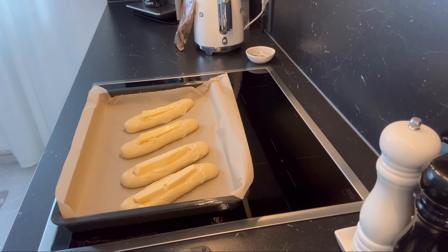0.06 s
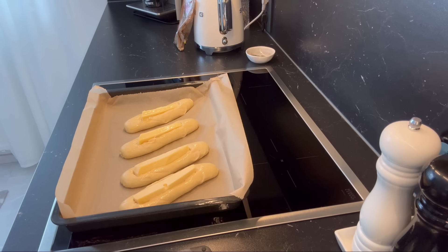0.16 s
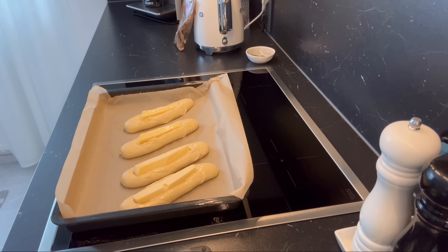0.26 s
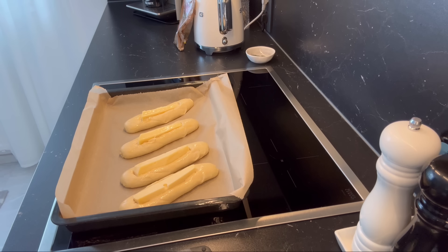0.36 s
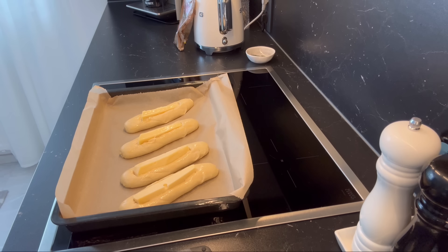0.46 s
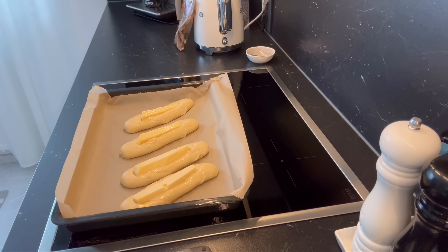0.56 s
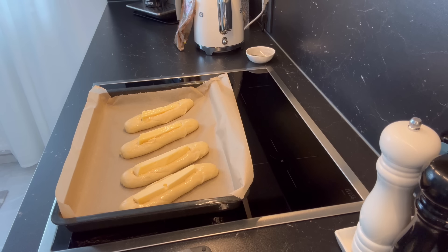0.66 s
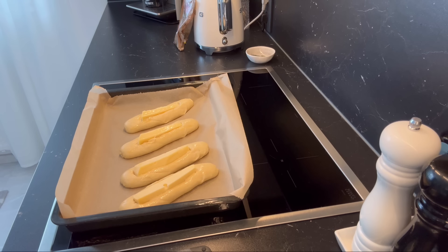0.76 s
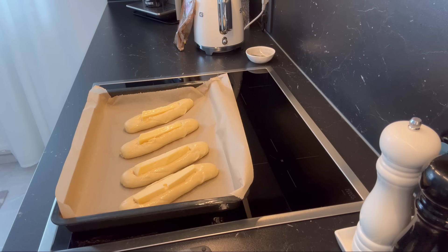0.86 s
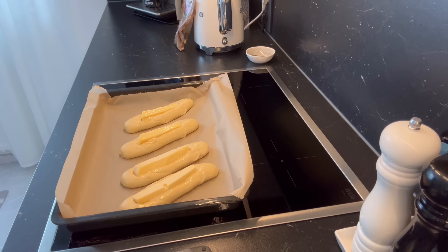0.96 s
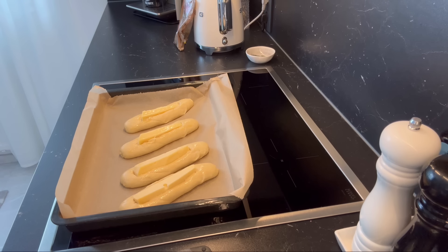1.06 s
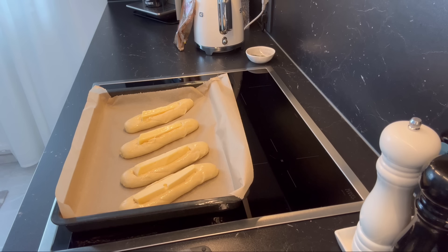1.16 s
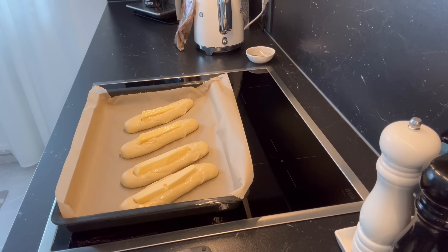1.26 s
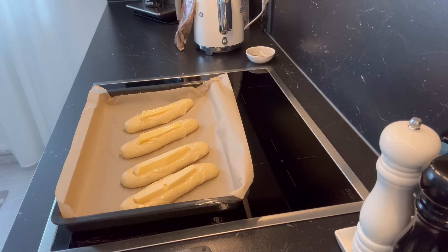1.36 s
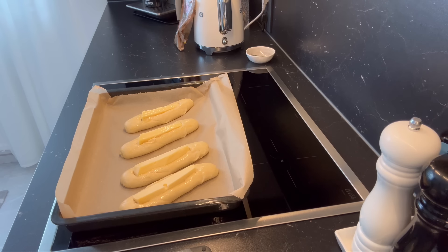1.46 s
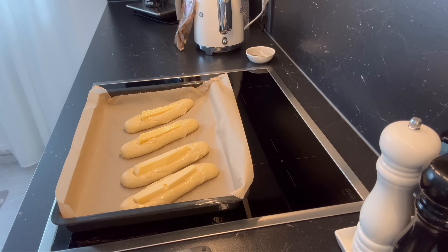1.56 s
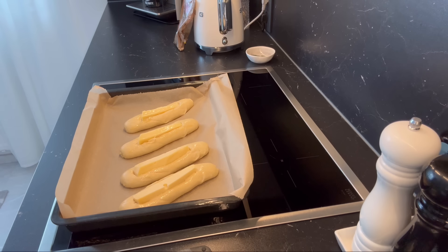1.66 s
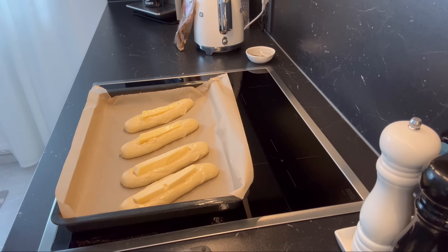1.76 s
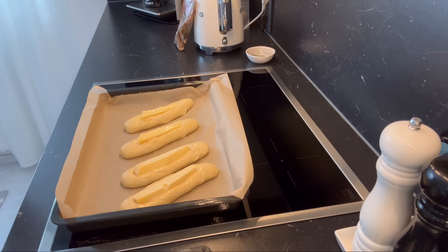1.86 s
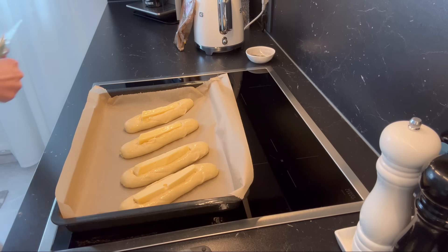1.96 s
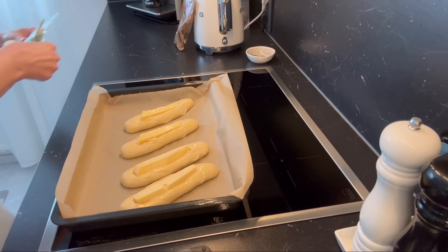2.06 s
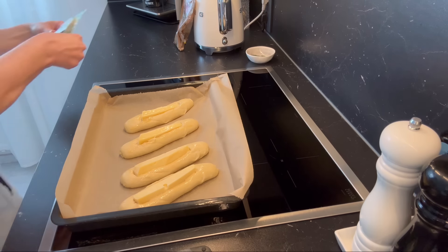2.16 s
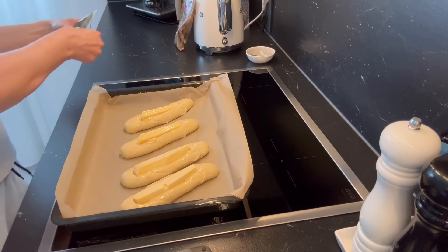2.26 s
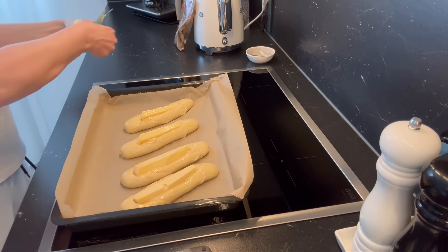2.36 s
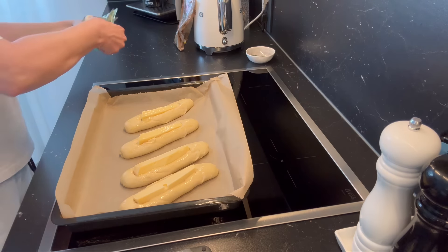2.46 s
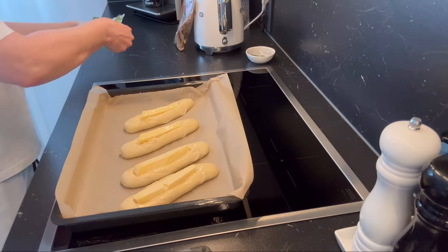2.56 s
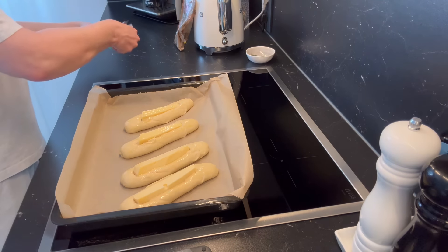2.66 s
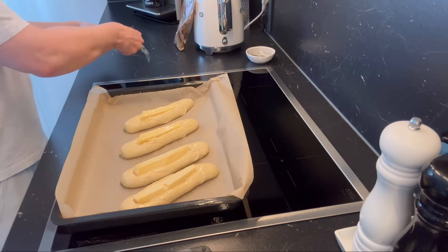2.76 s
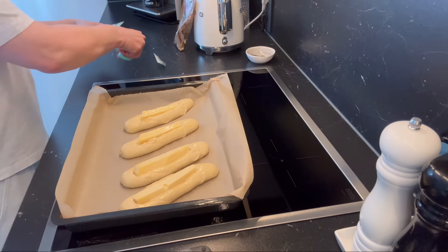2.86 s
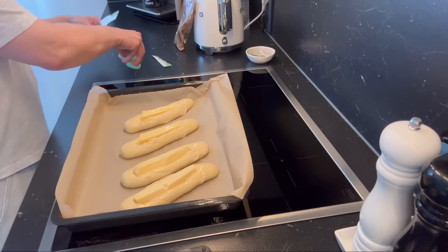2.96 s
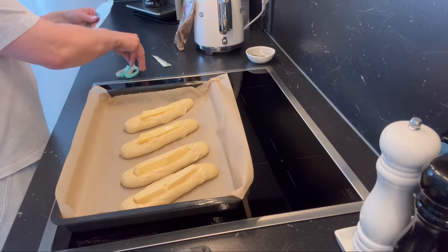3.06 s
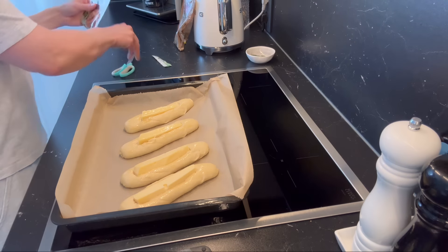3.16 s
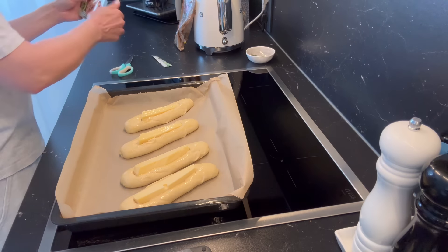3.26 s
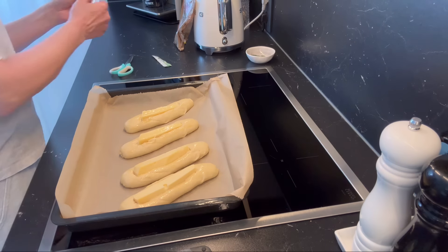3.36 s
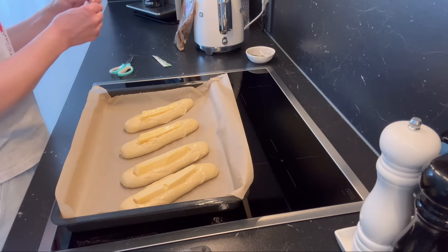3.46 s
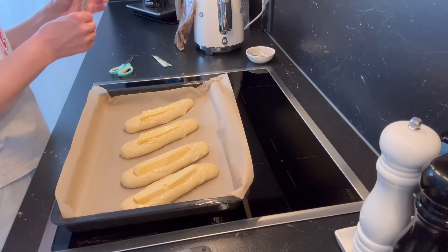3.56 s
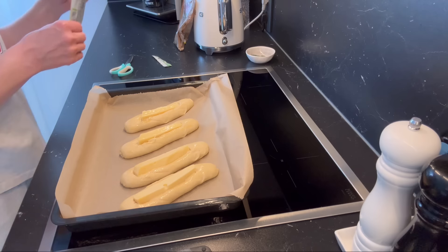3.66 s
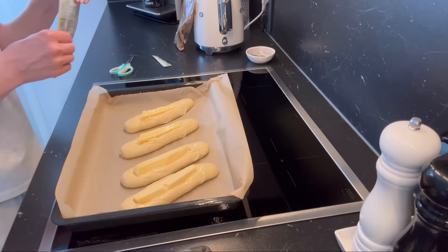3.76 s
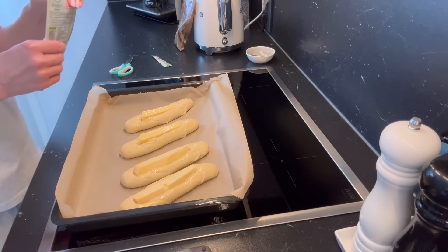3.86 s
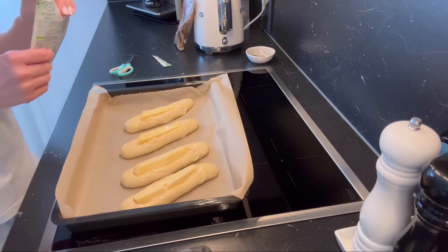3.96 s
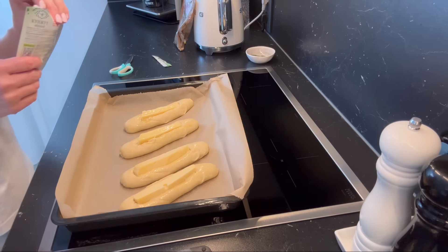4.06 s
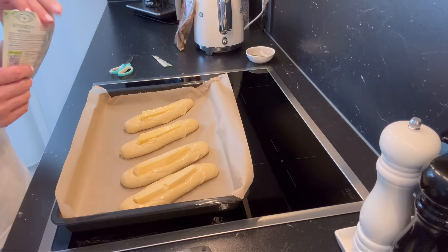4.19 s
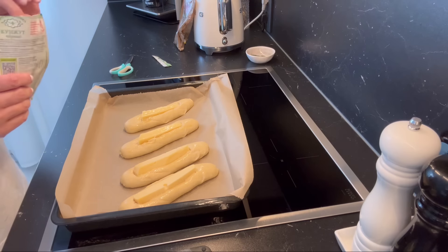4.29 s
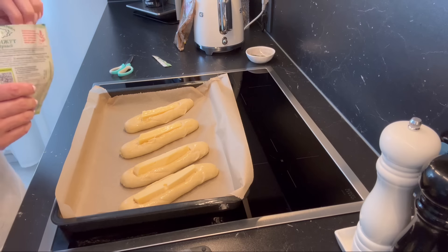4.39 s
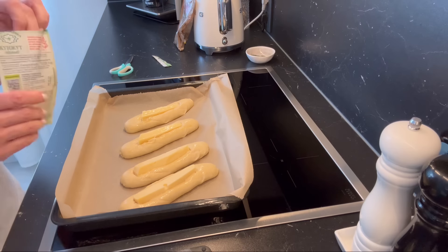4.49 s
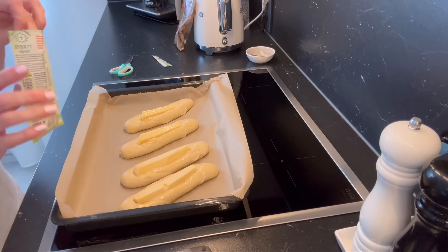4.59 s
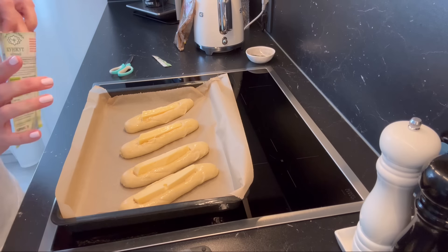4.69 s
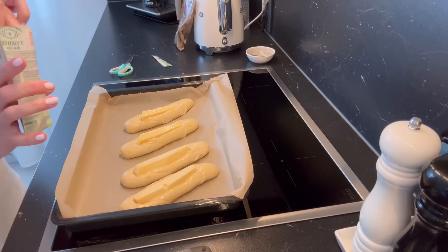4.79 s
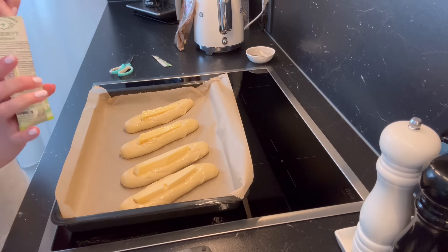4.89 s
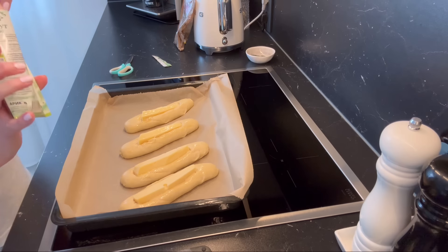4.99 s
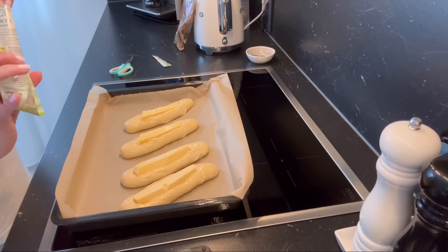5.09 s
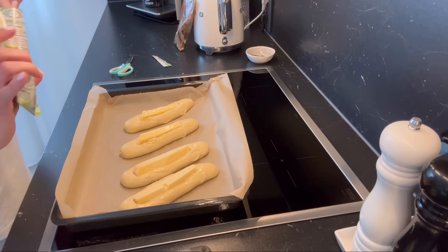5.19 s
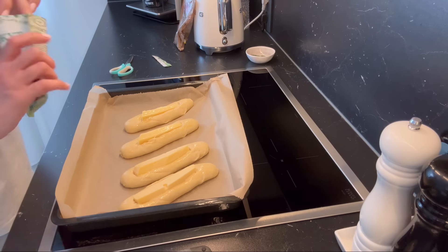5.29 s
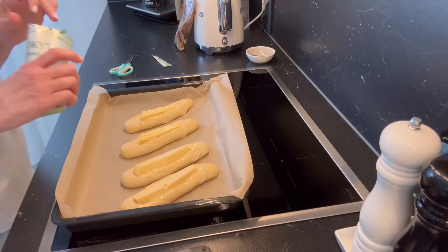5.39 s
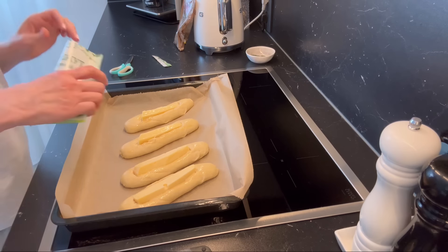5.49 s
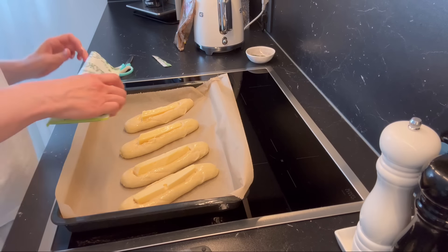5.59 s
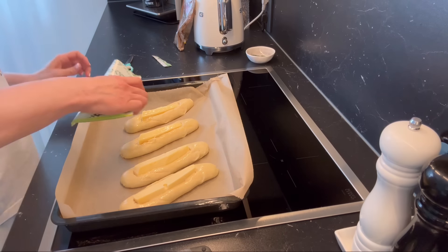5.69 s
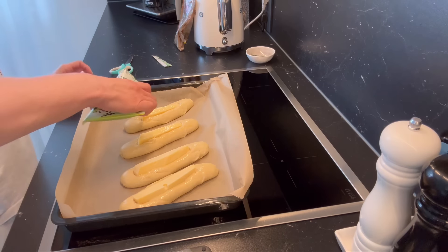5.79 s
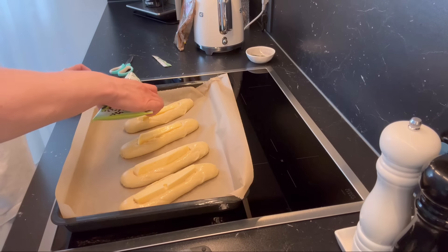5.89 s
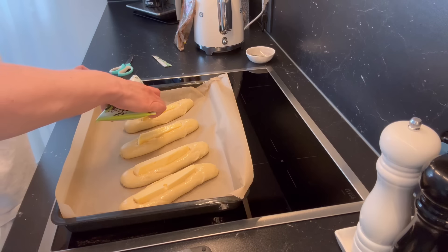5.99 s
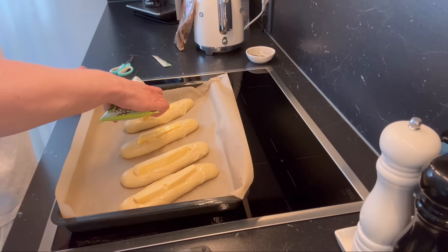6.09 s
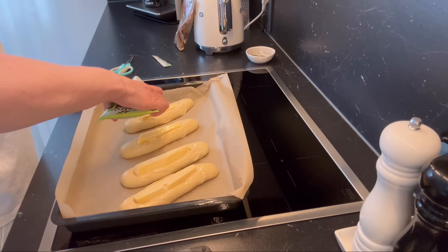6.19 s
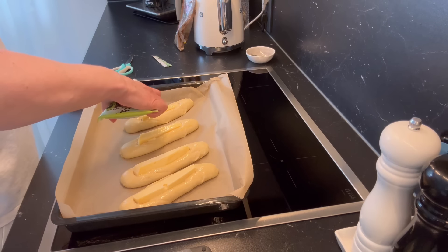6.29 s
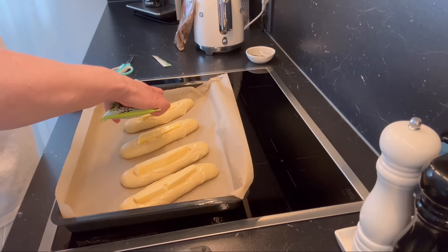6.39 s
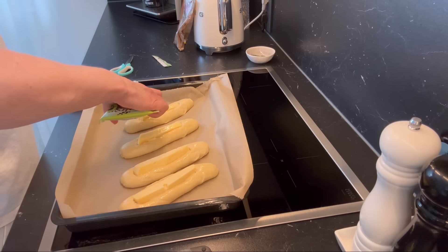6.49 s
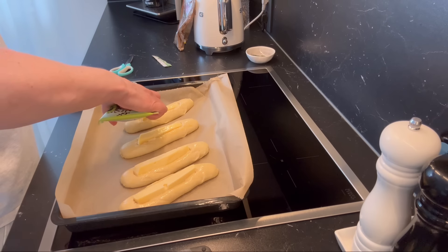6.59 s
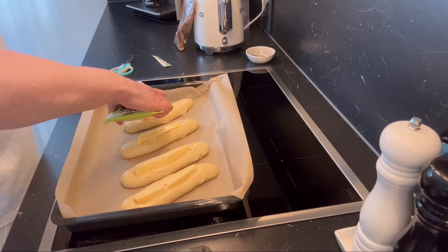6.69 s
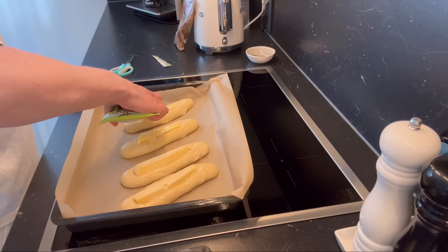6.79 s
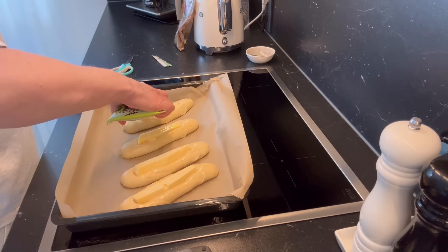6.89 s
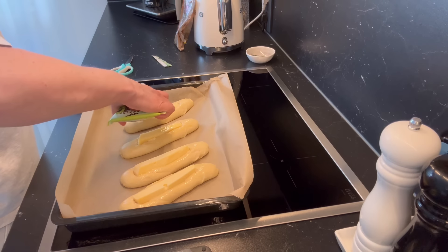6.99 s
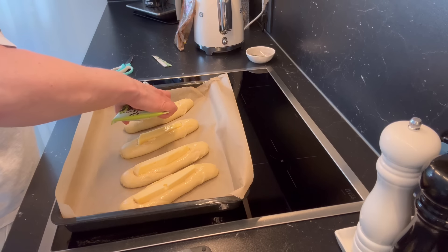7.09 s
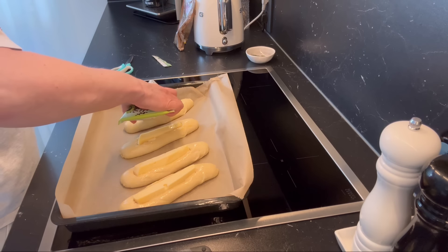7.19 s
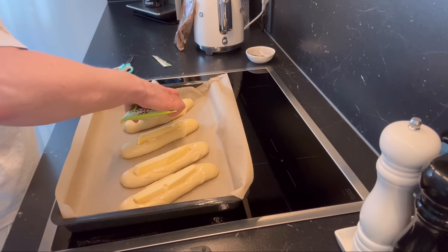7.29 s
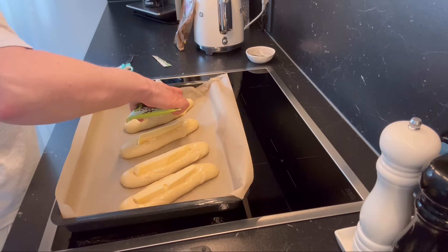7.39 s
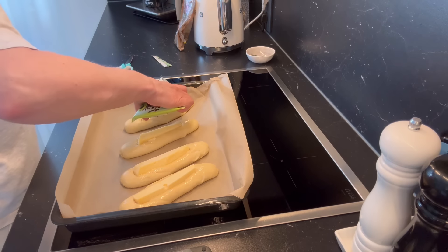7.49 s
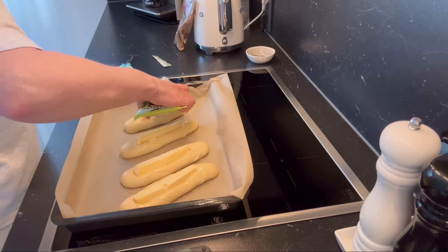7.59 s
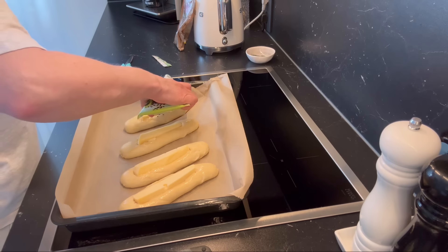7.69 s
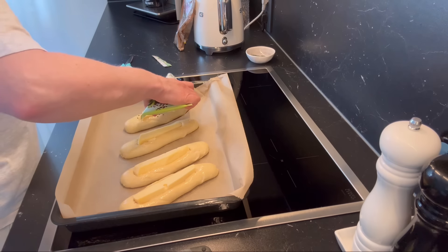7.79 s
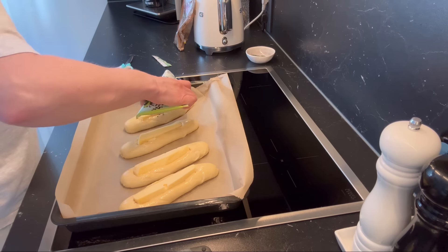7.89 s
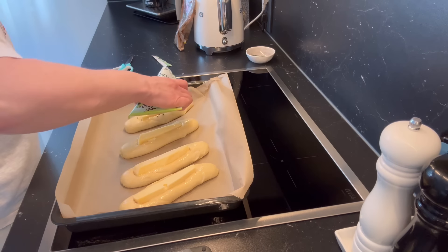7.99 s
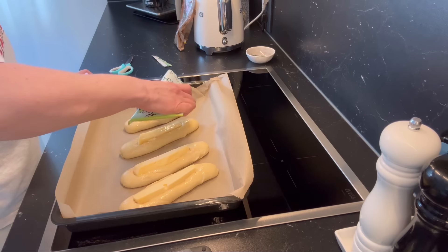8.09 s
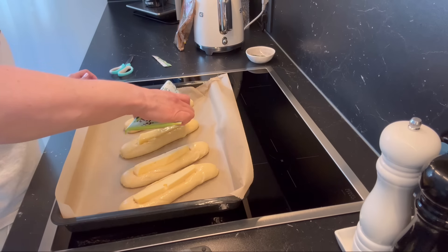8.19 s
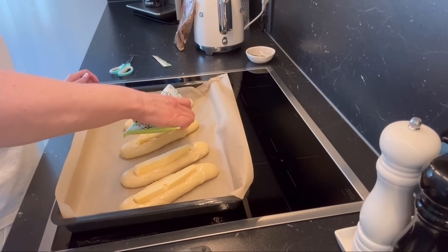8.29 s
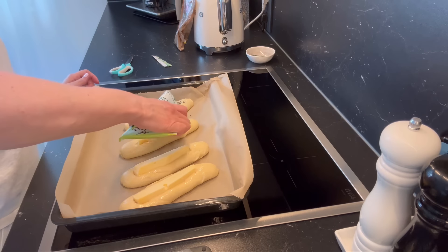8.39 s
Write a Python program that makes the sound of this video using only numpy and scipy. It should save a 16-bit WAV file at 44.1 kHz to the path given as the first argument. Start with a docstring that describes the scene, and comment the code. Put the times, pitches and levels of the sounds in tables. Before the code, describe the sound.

A drawer bumps shut with a brief steel jingle, followed by low footfalls and faint plastic crinkles. Sharp snips cut a small packet; scissors drop and bounce on a stone worktop. The film then snaps loudly, and seeds slide and patter as the packet is shaken, fading to sparse ticks. Close small stereo microphone in a reflective kitchen, faint fridge hum.

```python
"""Seed packet in a kitchen

In a hard kitchen a drawer shuts with a jingle of cutlery, and someone steps about: decaying sines, low noise.
A small plastic packet is handled and cut open: clumps of clicks ring its film and body.
Scissors drop on the worktop and bounce: noise ticks, ringing modes and a rattle.
Seeds then slide and hiss in the shaken packet: dense grains under swells. A fridge hums in the room tone:
narrow noise bands and a whine over air noise. Random taps give the room's reflections."""
import sys
import numpy as np
from scipy import signal
from scipy.fft import rfft, irfft, next_fast_len
from scipy.io import wavfile
from scipy.ndimage import uniform_filter1d

SR = 44100
rng = np.random.default_rng(int(sys.argv[2]) if len(sys.argv) > 2 else 0)


def dump_mix(stems):
    """Bounce the given channels to the path in sys.argv[1] as a 16-bit WAV at rate SR."""
    frames = np.atleast_2d(stems).T  # one column per channel
    limited = np.clip(frames, -1, 1)  # hard clip at full scale
    pcm = np.round(limited * 32767).astype(np.int16)
    wavfile.write(sys.argv[1], SR, pcm)


N = 372644


def gain_of(db):
    """dB to gain."""
    return 10 ** (np.asarray(db) / 20)


def evened(x):
    """Scales to rms 1."""
    return x / np.sqrt(np.mean(x ** 2) + 1e-20)


def read(points, hz):
    """Reads a spectrum on a log-frequency axis."""
    f, value = np.transpose(points)
    return np.interp(np.log(hz + 1), np.log(f + 1), value)


def curves(table):
    """Each column after the first (seconds) as a curve at sample rate."""
    s, *columns = np.transpose(table)
    return [np.interp(np.arange(N) / SR, s, c) for c in columns]


def add(mix, s, sound):
    """Mixes a sound in at time s, in place."""
    part = mix[round(s * SR):][:len(sound)]
    part += sound[:len(part)]


def shaped(x, response):
    """Filters by a function of frequency."""
    size = next_fast_len(N)
    return irfft(rfft(x, size) * response(np.fft.rfftfreq(size, 1 / SR)), size)[..., :N]


def coloured(x, tone):
    """Noise or clicks filtered to a spectrum in relative dB, at rms 1."""
    return evened(shaped(x, lambda hz: gain_of(read(tone, hz))))


def above(hz, corner_hz):
    """Gentle high-pass response, -6 dB at the corner."""
    return hz ** 2 / (hz ** 2 + corner_hz ** 2)


def resonate(x, hz, width_hz):
    """A fixed resonance of gain 1 at its centre."""
    return signal.lfilter(*signal.iirpeak(hz, hz / width_hz, SR), x)


def swell(t, db, rise_s, t60_s):
    """Envelope that rises as t squared, then dies exponentially."""
    return np.minimum(t / rise_s, 1) ** 2 * gain_of(db - 60 * np.maximum(t - rise_s, 0) / t60_s)


def grains(per_s, spread_db, tone):
    """Random tiny clicks of unlike sizes, coloured by what they shake."""
    sizes = gain_of(spread_db * np.minimum(rng.exponential(1, N), 5))
    clicks = rng.standard_normal(N) * sizes * (rng.random(N) < per_s / SR)
    return coloured(clicks, tone)


def room_tone():
    """Steady air noise, partly shared by the ports, and the fuzzy lines of the fridge with a thin whine."""
    # Each row: frequency in Hz, density in relative dB.
    air_tone = [(30, -14), (87, -8), (250, -14.5), (344, -13), (545, -16.5), (750, -22), (1040, -21.5),
                (1300, -41.5), (3000, -39), (9000, -41), (13500, -54), (14500, -83.5)]
    # Left-right correlation of the air noise. Each row: frequency in Hz, likeness from -1 to 1.
    likeness = [(60, 0.42), (240, -0.074), (950, -0.51), (3770, 0.11), (15000, 0.94)]
    # Fridge lines. Each row: frequency in Hz, width in Hz, level in dB.
    hum_lines = [(75.2, 12.4, -63.5), (199.8, 4.6, -72), (312.7, 11, -71.5), (364.8, 13, -74.5)]
    air_db, whine_hz, whine_db = -61, 3208, -82

    def same(hz):
        return np.clip(read(likeness, hz), -1, 1)

    left, other = rng.standard_normal((2, N))
    right = shaped(left, same) + shaped(other, lambda hz: np.sqrt(1 - same(hz) ** 2))
    air = coloured(np.array([left, right]), air_tone)
    hum = np.zeros(N)
    for hz, width_hz, db in hum_lines:
        once = resonate(rng.standard_normal(N), hz, width_hz)
        hum += gain_of(db) * evened(resonate(once, hz, width_hz))
    whine = gain_of(whine_db) * np.sin(2 * np.pi * whine_hz * np.arange(N) / SR)
    return (gain_of(air_db) * air + hum + whine) * gain_of([[-1.6], [1.7]])  # left, right dB


def rumble():
    """Lumpy low noise from wood and panels: a slow bed, and knocks that swell and die, some brighter."""
    # Someone moving about. Each row: time in seconds, level in dB, brightness in dB.
    bed = [(0.25, -44.5, -22), (0.93, -49.5, -31), (1.14, -66, 15.5), (1.57, -64.5, -5), (2.0, -62, 5.5),
           (2.9, -75.5, 12.5), (3.8, -74.5, 4), (4.5, -57.5, 6.5), (5.3, -58.5, -3.5), (5.8, -93, 5)]
    # Drawer, cupboard and hands. Each row: peak in seconds, level in dB, brightness in dB,
    # rise in seconds, t60 in seconds.
    knocks = [(0.073, -36, 4, 0.047, 0.21), (0.131, -25, -0.5, 0.052, 0.19),
              (1.028, -36.5, -10.5, 0.15, 0.14), (2.28, -58.5, 13.5, 0.14, 0.55),
              (2.42, -60.5, 18.5, 0.14, 0.14), (2.659, -62, 20, 0.021, 0.17), (3.4, -47.5, -12, 0.19, 0.6),
              (3.76, -53.5, 4, 0.087, 0.055), (4.619, -39.5, -26, 0.18, 0.048),
              (4.906, -36, -12, 0.018, 0.12), (5.588, -52, 10.5, 0.0078, 0.23)]
    # Each row: frequency in Hz, density in relative dB.
    rumble_tone = [(40, -23.5), (75, 3), (130, -6.5), (200, -1), (256, -9), (404, -6.5), (593, -8),
                   (680, -14.5), (815, -12), (2020, -27.5), (9000, -44), (15000, -46)]
    t = np.arange(SR) / SR
    level_db, bright_db = curves(bed)
    low_power = gain_of(2 * level_db)
    high_power = gain_of(2 * (level_db + bright_db))
    for s, db, knock_bright_db, rise_s, t60_s in knocks:
        envelope = swell(t, db, rise_s, t60_s)
        start_s = max(s - rise_s, 0)
        add(low_power, start_s, envelope ** 2)
        add(high_power, start_s, (envelope * gain_of(knock_bright_db)) ** 2)
    noise = coloured(rng.standard_normal(N), rumble_tone)
    high = shaped(noise, lambda hz: above(hz, 310.0))
    return np.sqrt(low_power) * (noise - high) + np.sqrt(high_power) * high


def rustle():
    """Small creases crackle in clumps; fuller handling brings out the body of the bag."""
    # Hands working the packet. Each row: time in seconds, level in dB, body against film in dB.
    handling = [(0.1, -57.5, -2), (0.3, -81, -15.5), (0.75, -71.5, 12.5), (0.95, -79, -3), (1.11, -66, 6),
                (1.25, -76, 22), (1.35, -73.5, -9), (1.57, -71, -31), (1.75, -65.5, 7), (2.33, -59, -18),
                (2.56, -63, 0), (2.67, -57, -3), (2.89, -72, -21), (3.1, -57, 5), (3.35, -87, -6),
                (3.49, -61, 8), (3.6, -86, 2), (3.89, -60, -16), (4.05, -76, 8), (4.3, -56, -9),
                (4.86, -52, 4), (5.0, -56.5, 1), (5.42, -58.5, 8), (5.56, -73.5, 10), (5.75, -80, 10)]
    # Each row: frequency in Hz, density in relative dB.
    film_tone = [(500, -57), (1000, -8.5), (1500, -6.5), (2500, -4), (5500, -7), (8500, -4.5),
                 (13500, -10.5), (14800, -40)]
    level_db, body_db = curves(handling)
    clumps = evened(uniform_filter1d(rng.standard_normal(N), 500))
    film = grains(1800, 2.7, film_tone) * gain_of(2. * clumps)
    body = resonate(film, 1600, 2500)
    return gain_of(level_db) * (film + (gain_of(body_db) - 1) * body)


def cutlery():
    """Each jolt rings slightly different pieces of steel."""
    # Jolts as the drawer shuts. Each row: start in seconds, level in dB.
    jolts = [(.02, -49), (.05, -66), (.121, -47), (.165, -53)]
    # Modes of the steel. Each row: nominal frequency in Hz, nominal relative level in dB.
    steel_modes = [(8500, -1.1), (12050, 1), (13650, 1)]
    t60_s = 0.14
    t, out = np.arange(SR // 4) / SR, np.zeros(N)
    for s, db in jolts:
        for hz, mode_db in steel_modes:
            u, v = rng.standard_normal(2)
            envelope = gain_of(db + mode_db + 1.7 * u - 60 * t / t60_s)
            add(out, s, envelope * np.sin(2 * np.pi * hz * (1 + 0.0072 * v) * t))
    return out


def thuds():
    """A soft push sets a panel or the floor swinging at one low pitch."""
    # Drawer meeting its stop, then knocks and heels on the floor.
    # Each row: start in seconds, level in dB, frequency in Hz, t60 in seconds.
    pushes = [(0.051, -32.5, 127.9, 0.5), (0.116, -38.5, 197, 0.44), (0.119, -24.5, 399, 0.17),
              (0.968, -45, 528, 0.12), (0.975, -38, 1030, 0.053), (1.007, -35.5, 82.7, 0.33),
              (1.169, -30, 50.6, 0.2), (1.212, -32, 45.4, 0.27), (1.902, -32.5, 54.4, 0.16),
              (1.941, -30, 51.7, 0.097), (2.011, -36, 45, 0.1), (2.132, -29, 88.3, 0.081),
              (2.205, -40, 81.4, 0.11), (4.58, -47, 88, 0.11), (4.899, -46, 69, 0.091)]
    t, out = np.arange(SR // 2) / SR, np.zeros(N)
    for s, db, hz, t60_s in pushes:
        envelope = gain_of(db - 60 * t / t60_s) * (1 - np.exp(-t / 0.011))
        add(out, s, envelope * np.sin(2 * np.pi * hz * t) * 2)
    return out


def snaps():
    """Each crease gives way in a sharp click and a dying clump of smaller ones that ring the packet."""
    # Each row: start in seconds, level of the bright edge in dB, film and body in dB against it,
    # t60 of the after-crackle in seconds, pitch of the film in Hz.
    creases = [(0.5652, -43, -3, 8, 0.34, 2030), (0.758, -51.5, 5, -12, 0.23, 4660),
               (0.845, -52, -5, 13.5, 0.12, 2000), (0.964, -53, -23, 18, 0.64, 1800.0),
               (1.082, -58, 23, -3, 0.22, 4240), (1.131, -46.5, 8.5, -12, 0.2, 4900),
               (1.165, -51, 13, -7, 0.31, 4500), (1.543, -55.5, 11, -20, 0.068, 2420),
               (1.5573, -38.5, 8.5, -30, 0.051, 3500), (1.621, -34.5, 0, -8, 0.18, 5800),
               (1.76, -39.5, -14, 5, 0.23, 2660), (1.7943, -31.5, -21, -20, 0.24, 2020.0),
               (1.839, -29.5, -16, -7.5, 0.08, 1840.0), (1.9529, -32.5, -34, 0, 0.2, 2570),
               (2.015, -30.5, -25, -15, 0.1, 4660), (2.151, -30.5, -30, -9, 0.35, 6900),
               (2.194, -28.5, -12, -8, 0.19, 6900), (2.292, -25, -35, -19, 0.17, 7200),
               (2.405, -34.5, -30, -1.5, 0.17, 2210.0), (2.419, -24.5, -16, -10.5, 0.12, 7260),
               (2.49, -30, -1.5, -0.5, 0.099, 7200), (2.6169, -38.5, -11, 2.5, 0.58, 7100),
               (2.6567, -15, -24, -24, 0.13, 7460), (2.869, -41, -23, 4, 0.14, 2070.0),
               (3.453, -27, -16, -5.5, 0.31, 2440), (3.7343, -34.5, -3, 4.5, 0.13, 1800.0),
               (3.9133, -20.5, -26, -14.5, 0.11, 6950), (3.9405, -27.5, -32, -21, 0.18, 7000.0),
               (4.174, -52, -14, 26, 0.082, 2020.0), (4.202, -23, -19, -21, 0.084, 3220),
               (4.216, -13, -7.5, -40, 0.097, 5200), (4.3191, -21, -5.5, 0.5, 0.039, 5400),
               (4.358, -30, 4.5, -1.5, 0.037, 5560), (4.374, -36, -29, 9.5, 0.1, 2080),
               (4.412, -24.5, -11.5, -7, 0.037, 5500), (4.422, -10.5, -15.5, -19, 0.06, 6840.0),
               (4.474, -25, 0.5, -1, 0.077, 5100), (4.4957, -28, -31, -4, 0.21, 2850.0),
               (4.5243, -22.5, 1.5, 1, 0.055, 3700), (4.5607, -29, -3.5, -4, 0.13, 1880),
               (4.594, -15, 2, -2.5, 0.046, 5650), (4.632, -20, -39, -33, 0.093, 6900),
               (4.7445, -24.5, -15, 6.5, 0.19, 1990), (4.8026, -21.5, -11, 3, 0.16, 2560),
               (4.899, -44, -18, 18.5, 0.071, 1800.0), (4.9513, -24, 6, 11, 0.021, 3000),
               (5.029, -24.5, -23, 8.5, 0.025, 2100), (5.1072, -9, -13, -36, 0.042, 1850),
               (5.2258, -52, -9, 23, 0.054, 1800.0), (5.278, -44.5, 5, 12.5, 0.032, 2460),
               (5.571, -49, 12, -18, 0.12, 1820), (5.5902, -10, -10.5, -14, 0.043, 6700),
               (5.9676, -53, -6, 4, 0.2, 2900), (6.055, -51, 12, -19, 0.034, 3760.0),
               (7.612, -49, 0, -2, 0.045, 2250), (8.145, -33.5, -2.5, -33, 0.061, 3000),
               (8.21, -42, -10, -29, 0.076, 3700), (8.222, -43, 12.5, -34, 0.04, 3960),
               (8.2802, -46, 9, -28, 0.054, 3660)]
    # Broad resonances, edge then body. Each row: frequency in Hz, width in Hz.
    packet_modes = [(8300, 14500), (1100, 2350)]
    click_rise_s, click_t60_s, crack_db = 0.00019, 0.0064, 13
    after_db, slower_db = -15, 2.5  # after-crackle at t60 0.05 s, and gain per doubling of t60
    film_q, thin_hz = 2.4, 790  # the film radiates little below thin_hz
    t, out = np.arange(6000) / SR, np.zeros(N)
    for s, db, film_db, body_db, t60_s, film_hz in creases:
        sizes = gain_of(3.5 * rng.exponential(1, len(t)).clip(0, 5))
        crackle_db = after_db + slower_db * np.log2(t60_s / 0.05)
        decay = gain_of(-60 * t / click_t60_s) + gain_of(crackle_db - 60 * t / t60_s)
        clump = rng.standard_normal(len(t)) * sizes * (1 - np.exp(-t / click_rise_s)) * decay
        clump[[20, 115]] += gain_of(crack_db)  # the crack comes back off the worktop about 2 ms later
        snap = np.zeros(len(t))
        modes = (*packet_modes, (film_hz, film_hz / film_q))
        for mode, mode_db in zip(modes, (0, body_db, film_db)):
            ring = resonate(clump, *mode)
            snap += gain_of(mode_db) * ring / abs(ring).max()
        add(out, s, gain_of(db) * snap)
    return signal.lfilter(*signal.butter(2, thin_hz, "high", fs=SR), out)


def scissors():
    """Steel ticks on stone, and each blow rings the worktop and rattles the handles."""
    # Each row: start in seconds, tick peak in dB, blow into the worktop in dB, rattle of the handles in dB.
    bounces = [(3.025, -12.5, -30, -27.5), (3.047, -11.5, -18.5, -31.5), (3.0856, -3, -11.5, -21.5),
               (3.161, -21, -20, -36), (3.1746, -40, -23, -31), (3.2045, -35, -29, -39),
               (3.2265, -15, -20.5, -31), (3.2859, -26, -31.5, -36), (3.3421, -39, -35, -50.5)]
    # Each row: nominal frequency in Hz, nominal relative level in dB, t60 in seconds.
    worktop_modes = [(107.6, -12.5, 0.36), (195, -2, 0.14), (378, -7.5, 0.082), (542, -2.5, 0.09),
                     (965, -9.5, 0.062), (1355, -21.5, 0.092), (1544, -10, 0.051), (1740, -6, 0.026),
                     (1980, -11, 0.039), (2330, -19, 0.15), (2840, -26, 0.051), (3510, -24, 0.056)]
    t, out = np.arange(SR // 2) / SR, np.zeros(N)
    for s, tick_db, blow_db, rattle_db in bounces:
        ring = np.zeros(len(t))
        for hz, db, t60_s in worktop_modes:
            u, v, phase = rng.standard_normal(3)  # each blow lands elsewhere
            envelope = gain_of(db + 1.5 * u - 60 * t / t60_s)
            envelope *= 1 - np.exp(-t * hz / 0.82)  # low modes build slowly
            ring += envelope * np.sin(2 * np.pi * hz * (1 + 0.031 * v) * t + phase)
        tick = resonate(rng.standard_normal(len(t)) * gain_of(-60 * t / 0.006), 10500, 6400)
        noise = rng.standard_normal(len(t)) * gain_of(rattle_db - 60 * t / 0.16)
        rattle = resonate(noise, 1900, 1400) + gain_of(14.5) * resonate(noise, 410, 584)
        add(out, s, gain_of(blow_db) * ring + rattle + gain_of(tick_db) * tick / abs(tick).max())
    return out


def seeds():
    """At each flick of the wrist a dense patter swells and trails off as the seeds slide one way."""
    # Each row: peak in seconds, level in dB, t60 in seconds.
    slides = [(5.66, -49, .6), (5.738, -45, 0.63), (5.91, -57, 0.11), (5.98, -55.5, 0.66),
              (6.118, -55.5, 0.53), (6.269, -52, 0.53), (6.414, -51, .5), (6.485, -52, 0.51),
              (6.59, -50.5, 0.11), (6.654, -50, 0.29), (6.75, -48.5, .3), (6.825, -45.5, .18),
              (6.909, -50, 0.41), (6.989, -49.5, 0.18), (7.07, -59.5, 0.33), (7.14, -61, 0.19),
              (7.251, -65, 0.18), (7.305, -60, 0.092), (7.385, -60.5, 0.53), (7.465, -58, 0.063),
              (7.525, -62, 0.99), (7.67, -62.5, 0.28), (7.74, -61, 0.3), (8.24, -60, 0.66),
              (8.42, -59.5, .4)]
    # Each row: frequency in Hz, density in relative dB.
    seed_tone = [(590, -14), (1000, -14.5), (1480, -1), (1850, -7.5), (2500, -2.5), (3580, -1.5),
                 (6330, -6.5), (8500, -5), (13700, -12), (14600, -31)]
    rise_s = 0.082
    t, power = np.arange(SR) / SR, np.zeros(N)
    for s, db, t60_s in slides:
        add(power, s - rise_s, swell(t, db, rise_s, t60_s) ** 2)
    return np.sqrt(power) * grains(8000, 3.1, seed_tone)


def kitchen(x, early_db=-4.5, early_t60_s=0.026, late_db=-8.0):
    """Sparse taps of random sign: a quick flutter off tiles and worktop, then a tail dying band by band.
    It drifts between three random patterns, so no one colouring stands still.
    Narrow in the bass and near 10 kHz."""
    # Each row: frequency in Hz, t60 in seconds.
    late_t60 = [(100, 0.62), (500, 0.43), (2000, 0.36), (6000, 0.26), (14000, 0.019)]
    out, turn = 0, np.arange(N) / SR * 9.
    for k in range(3):
        taps = np.zeros((2, SR))
        at = np.arange(60, SR - 20, 20) + rng.integers(0, 20, (2, (SR - 61) // 20))
        np.put_along_axis(taps, at, rng.choice([-1., 1.], at.shape), 1)
        early = resonate(taps * gain_of(-60 * np.arange(SR) / SR / early_t60_s), 4000, 12000)
        hz, t, bands = signal.stft(taps, SR, nperseg=256)
        bands = bands * gain_of(-60 * t / read(late_t60, hz)[:, None])
        late = signal.istft(bands, SR, nperseg=256)[1][:, :SR]
        tail = gain_of(early_db) * early / np.linalg.norm(early[0])
        tail = tail + gain_of(late_db) * late / np.linalg.norm(late[0])
        share = np.sqrt(2 / 3) * np.cos(np.pi * (turn + k / 3))
        out = out + signal.fftconvolve(share * x[None], tail, axes=1)[:, :N]

    def width(hz):
        return above(hz, 110.0) * (1 - np.exp(-((hz - 9600) / 2600) ** 2))

    return out.mean(0), shaped(out[0] - out[1], width)


def scene():
    """Direct sound reaches the two ports with a delay and a tilt; the room surrounds them, near mono in the bass."""
    # Each row: frequency in Hz, left against right in dB.
    port_tilt = [(60, -6), (300, -8.5), (1500, -0.5), (8000, 0.5), (15000, 1.5)]
    lead_s = .000108  # the left port hears the packet first
    near = rumble() + rustle() + cutlery() + thuds() + snaps() + scissors() + seeds()
    side = np.array([[.5], [-.5]])
    direct = shaped(near, lambda hz: gain_of(side * read(port_tilt, hz)) * np.exp(2j * np.pi * side * lead_s * hz))
    middle, wide = kitchen(near)
    return direct + (middle + side * wide) * gain_of([[-1.], [1.2]]) + room_tone()


def record(dry):
    """The small microphone loses the deepest bass, and treble rolls off towards the band limit."""
    bass_hz, treble_hz, edge_hz = 32.0, 12700.0, 16300

    def response(hz):
        return hz ** 2 / np.hypot(hz ** 2, bass_hz ** 2) / np.sqrt(1 + (hz / treble_hz) ** 12)

    band_limit = signal.firwin(511, edge_hz, window=("kaiser", 9), fs=SR)
    return signal.oaconvolve(shaped(dry, response), band_limit[None], "same")


dry = scene()
out = record(dry)
dump_mix(out)
```